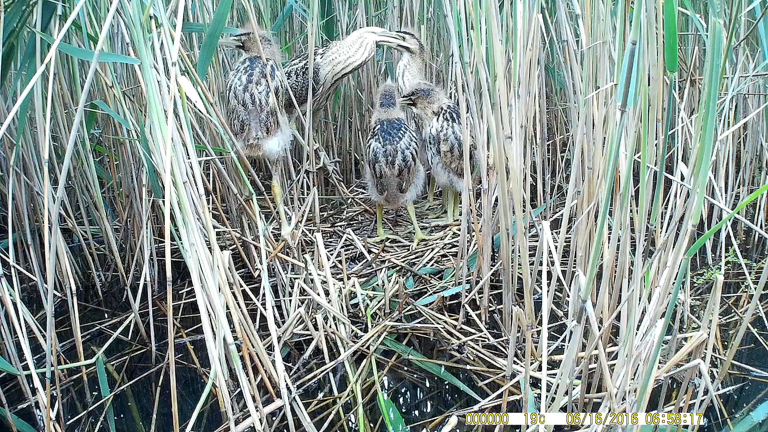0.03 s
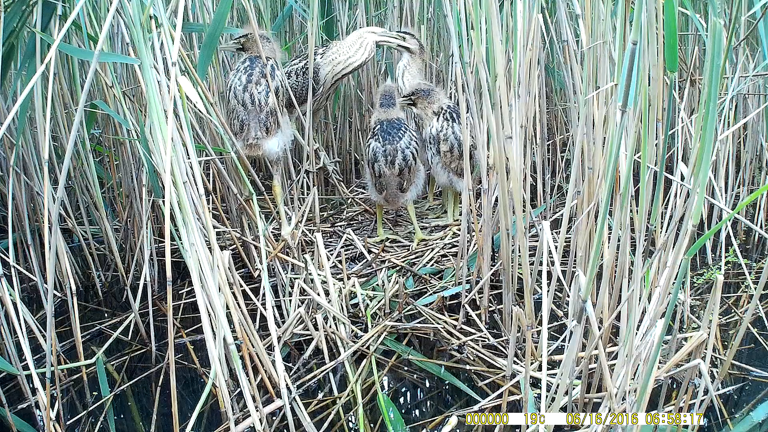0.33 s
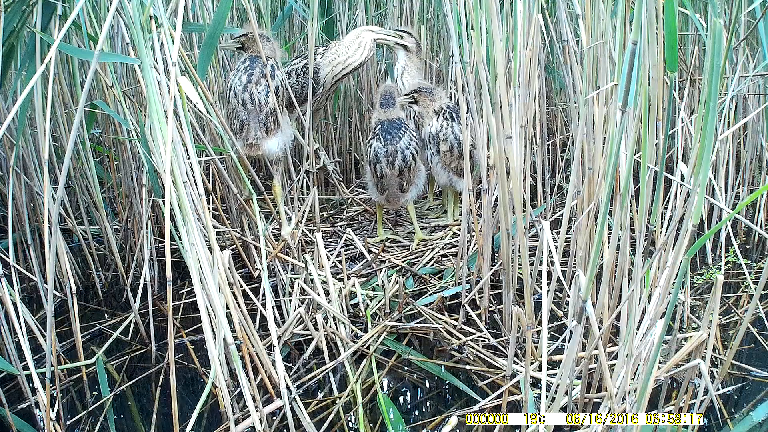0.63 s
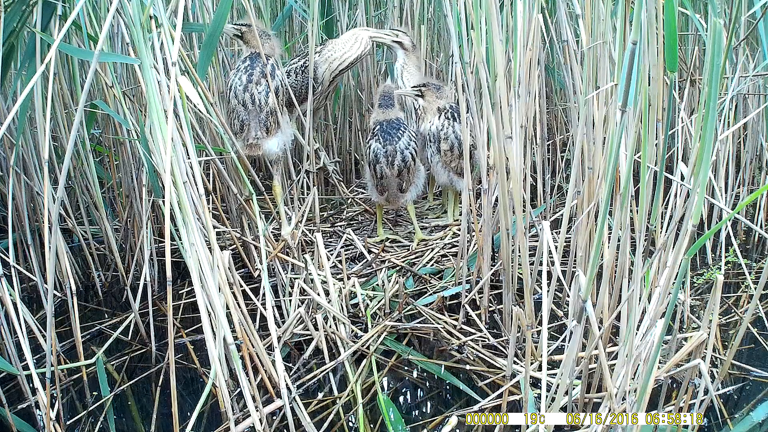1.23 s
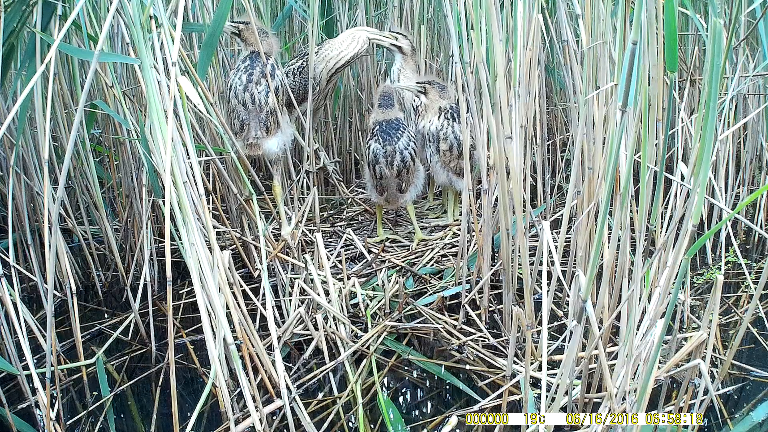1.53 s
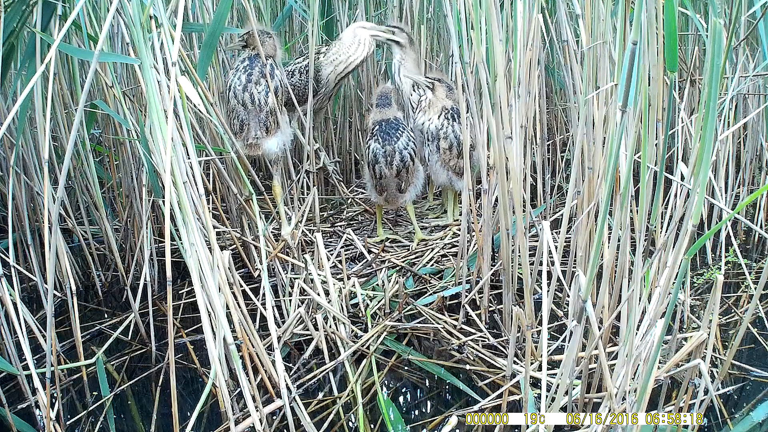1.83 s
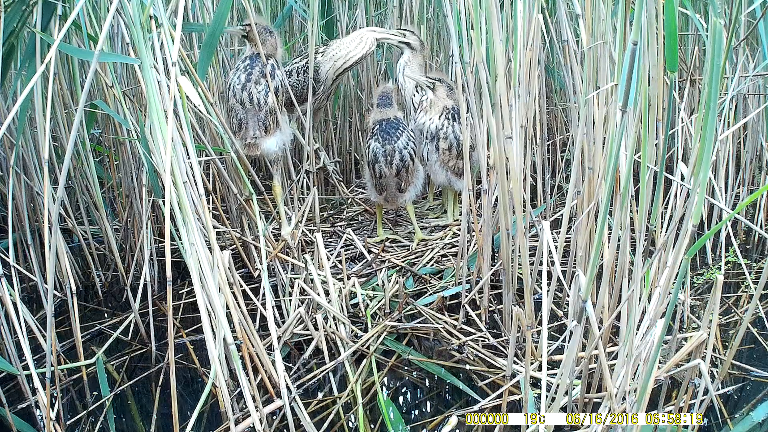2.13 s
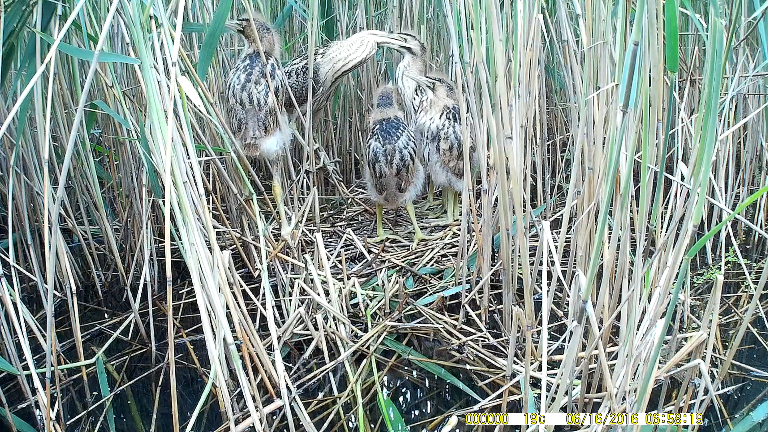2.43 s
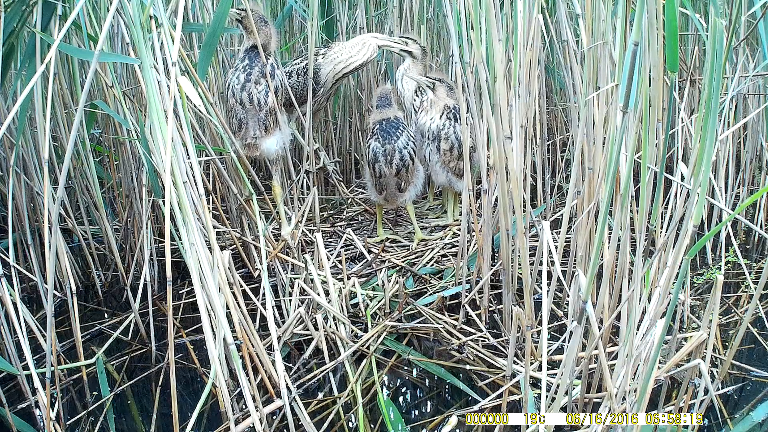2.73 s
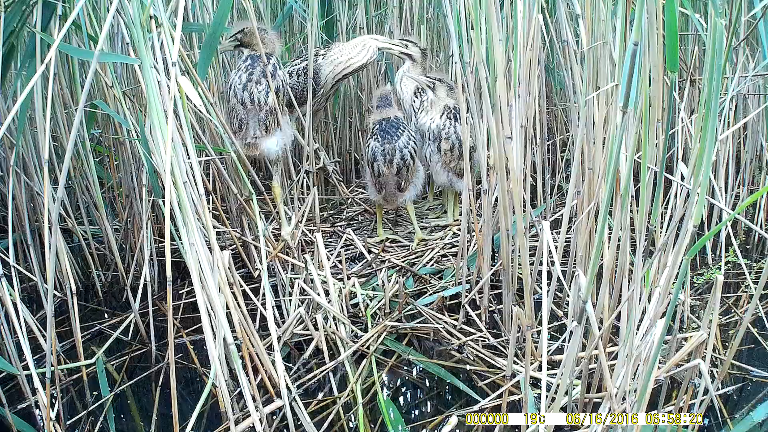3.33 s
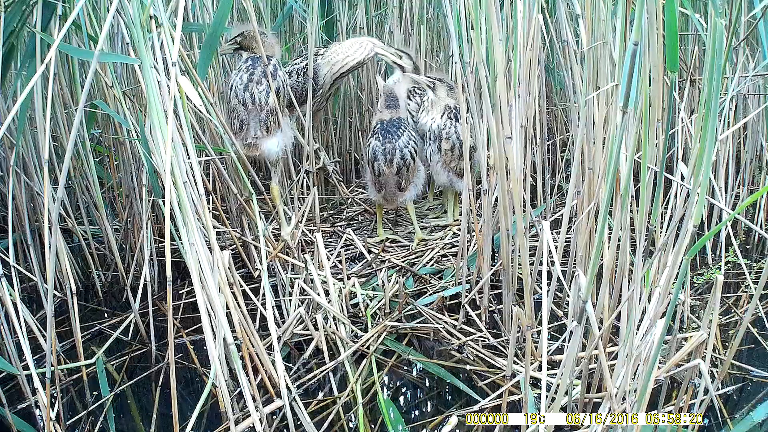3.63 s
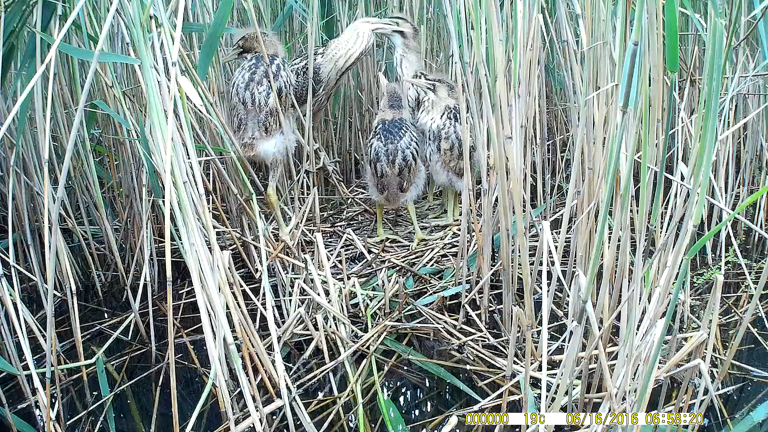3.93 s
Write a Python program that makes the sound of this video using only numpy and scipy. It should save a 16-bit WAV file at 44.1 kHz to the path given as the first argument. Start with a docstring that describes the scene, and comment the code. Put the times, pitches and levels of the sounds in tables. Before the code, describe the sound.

Young birds peep rapidly at a nest in the reeds, heard up close, while a more distant songbird whistles and ticks. The peeps grow hoarser, and four clucks lead into four harsh, squealing calls. A faint rumble lies underneath.

```python
"""A reed bed, one microphone close to a bittern nest. Chicks beg with rising peeps and soft mews; later
come four clucks and four harsh rattling calls, throat tones broken up by turbulence.
Farther off a songbird whistles, ticks, rasps and chirps. The reeds scatter every bird's voice.
Underneath lie a faint rumble, hiss and a thin electronic whine."""
import sys
import numpy as np
from scipy import signal
from scipy.fft import rfft, irfft
from scipy.io import wavfile
from scipy.ndimage import uniform_filter1d, map_coordinates

SR = 44100
rng = np.random.default_rng(int(sys.argv[2]) if len(sys.argv) > 2 else 0)


def materialize(psi):
    """Save the field psi as 16-bit PCM at rate SR to the path in sys.argv[1].

    A 1-D psi becomes a single channel; in a 2-D psi each row is a channel.
    """
    bounded = np.clip(np.atleast_2d(psi).T, -1, 1)
    quanta = np.round(bounded * 32767).astype(np.int16)
    wavfile.write(sys.argv[1], SR, quanta)


N = 176400
T = np.arange(N) / SR


def from_db(db):
    """Decibels to gain."""
    return 10 ** (np.asarray(db) / 20)


def rms_one(x):
    """Scale to unit power."""
    return x / np.sqrt(np.mean(np.abs(x) ** 2) + 1e-20)


def add(out, start_s, x):
    """Mix x into out from start_s."""
    i = int(max(start_s, 0) * SR)
    out[i:i + len(x)] += x[:max(N - i, 0)]


def colour(x, curve):
    """Filter by a curve of (freq_hz, gain_db) points."""
    hz, db = np.transpose(curve)
    bins_hz = np.linspace(1e-3, SR / 2, len(x) // 2 + 1)
    return irfft(rfft(x) * from_db(np.interp(np.log(bins_hz), np.log(hz), db)), len(x))


def drift(per_s, size):
    """A smooth random curve with a spread near 1, changing about per_s times a second."""
    steps = rng.standard_normal(8192)
    return map_coordinates(steps, [np.arange(size) * per_s / SR], order=2, mode="wrap")


def gate(t, length_s, edge_s):
    """Rounded attack, hold and release."""
    return np.sin(np.pi / 2 * np.clip(np.minimum(t, length_s - t) / edge_s + .5, 0, 1)) ** 2


def phase_of(hz):
    """Running phase of a changing pitch, in radians."""
    return 2 * np.pi * np.cumsum(hz) / SR


# The air over the reed bed: freq_hz, gain_db
AIR_SPECTRUM = [(18,-5),(50,-3.5),(105,-1),(160,-6.5),(300,-9),(500,-18.5),(800,-21.5),(4300,-24.5),(7000,-32),(11500,-41),(15500,-45.5)]
# Narrow bands of low hum: centre_hz, level_db, width_hz
HUM_BANDS = [(49.5,-56,6.6),(73.2,-46.5,3.376),(101.7,-52,8.8)]

def background(rumble_db=-46, hiss_db=-52, split_hz=600):
    """Low rumble with wavering hum, and smooth hiss."""
    air = colour(rng.standard_normal(N), AIR_SPECTRUM)
    rumble = signal.sosfiltfilt(signal.butter(2, split_hz, fs=SR, output="sos"), air)
    out = from_db(rumble_db) * rms_one(rumble) + from_db(hiss_db) * rms_one(air - rumble)
    for hz, db, width_hz in HUM_BANDS:
        waver = drift(2 * width_hz, N) + 1j * drift(2 * width_hz, N)
        out += from_db(db) * rms_one((waver * np.exp(2j * np.pi * hz * T)).real)
    return out


def whine(pitch_hz=9521, level_db=-60.5, slips_per_s=72.95, slip_s=.001):
    """A thin, even electronic tone that slips half a cycle at a fast steady beat."""
    beat = T * slips_per_s
    slips = np.floor(beat) + np.clip(beat % 1 / (slip_s * slips_per_s), 0, 1)
    return np.sqrt(2) * from_db(level_db) * np.sin(2 * np.pi * pitch_hz * T - np.pi * slips)


def reeds(x, echo_db, t60_s=.83, early_s=.02):
    """Nearby stems scatter sound densely back to the microphone; a faint tail dies away after."""
    t = T[:SR // 2]
    decay = from_db(-60 * t / t60_s) + 3.5 * np.exp(-t / early_s)
    echo = rng.standard_normal(len(t)) * decay * (t > .003)
    return x + from_db(echo_db) * signal.fftconvolve(x, echo / np.linalg.norm(echo))[:N]


# The songbird, deeper in the reeds: start_s, length_s, level_db, from_hz, to_hz, waver_share
SONG_NOTES = [(0.09,0.11,-39.5,3505,3575,0.008),(0.322,0.15,-38.5,3514,3435,0.009),(.715,.13,-41.5,2720,2980,0.05),(1.03,0.071,-44,3060,2900,0.05),
              (1.28,0.125,-40.5,2860,2940,0.035),(1.59,.11,-42,2830,2840,0.04),(2.956,0.057,-47.5,5800,5500,0.028),(3.06,.11,-43,5820,5400,0.03),
              (3.113,0.019,-36,2890,2880,0.012),(3.866,.022,-37,3200,3730,0.0084),(3.86,0.083,-47.5,4200,4330,.022)]

def songbird_notes(flutter=.34, wander=.005):
    """Gliding whistles that turn buzzy where the pitch wavers widely."""
    out = np.zeros(N)
    for start_s, length_s, db, from_hz, to_hz, waver in SONG_NOTES:
        t = T[:int(length_s * 1.4 * SR)] - length_s * .2
        glide_hz = from_hz + (to_hz - from_hz) * t / length_s
        hz = glide_hz * (1 + waver * drift(900, len(t)) + wander * drift(60, len(t)))
        level = from_db(db) * gate(t, length_s, .4 * length_s) * (1 + flutter * drift(100.2, len(t)))
        add(out, start_s + t[0], level * np.sin(phase_of(hz)))
    return out


# The songbird's rasps: start_s, length_s, level_db
SONG_RASPS = [(0.719,.185,-47),(0.98,0.215,-47),(1.27,0.21,-46.5),(1.56,0.205,-47)]
# The colour of a rasp, shared by ticks and hoarse peeps: freq_hz, gain_db
RASP_SPECTRUM = [(1500,-32),(2150,-15.5),(2500,-2),(2900,-5),(3350,-3.5),(3900,-9),(4500,-19.5),(7000,-48)]

def songbird_rasps(pulses_per_s=140, depth=.27):
    """Unevenly pulsing noise, accented about three quarters through each rasp."""
    level = np.zeros(N)
    for start_s, length_s, db in SONG_RASPS:
        progress = (T - start_s) / length_s
        accent = 1 + .8 * np.exp(-((progress - .76) / .085) ** 2)
        level += from_db(db) * gate(T - start_s, length_s, edge_s=.075) * accent
    pulses = 1 + depth * np.sin(phase_of(pulses_per_s * (1 + .278 * drift(80, N))))
    return level * pulses * rms_one(colour(rng.standard_normal(N), RASP_SPECTRUM))


# The songbird's ticks: start_s, level_db
SONG_TICKS = [(0.562,-38),(0.575,-37.5),(0.617,-33.5),(0.639,-36),(0.65,-31.5),(0.6985,-33.5),(0.73,-35.5)]

def songbird_ticks(decay_s=.006):
    """Dry snaps of noise that die at once."""
    level = np.zeros(N)
    for start_s, db in SONG_TICKS:
        add(level, start_s, from_db(db) * np.exp(-T[:SR // 10] / decay_s))
    noise = rng.standard_normal(N)
    return colour(level * noise, RASP_SPECTRUM) / np.std(colour(noise, RASP_SPECTRUM))


# Hoarse overtones of a chick's voice: harmonic, level_db
CHICK_OVERTONES = [(2,-1),(3,-14)]

def chick_voice(hz, hoarse, waver=.025):
    """A wavering tone with rough overtones."""
    phase = phase_of(hz * (1 + waver * drift(391, len(hz))))
    overtones = sum(from_db(db) * np.sin(round(harmonic) * phase) * (1 + drift(900, len(hz)))
                    for harmonic, db in CHICK_OVERTONES)
    return np.sqrt(2) * np.sin(phase) + hoarse * overtones


FLICK_KNEE_S, FLICK_RISE_S, FLICK_ATTACK_S = .0065, .0038, .0057

def peep(t, top_hz, hoarse, low_share=1055 / 1780, break_s=.004, rasp_db=-14):
    """A quick upward flick, loudest at t = 0; a hoarse one breaks into a rasp just after."""
    climb = 1 / (1 + np.exp((FLICK_KNEE_S - t) / FLICK_RISE_S))
    hz = top_hz * (low_share + (1 - low_share) * climb)
    level, breaking = (1 / (1 + ((t - lag) / FLICK_ATTACK_S) ** 2 / 2) ** 2 for lag in (0, break_s))
    rasp = from_db(rasp_db) * rms_one(colour(rng.standard_normal(len(t)), RASP_SPECTRUM))
    return level * chick_voice(hz, hoarse * breaking / level / 2) + hoarse * breaking * rasp


def mew(t, flick_db, top_hz=1460, hold_s=.0426, hold_db=-51.5):
    """A flick that levels off into a soft held arch."""
    rise = 1 - .33 / (1 + np.exp((t - FLICK_KNEE_S / 2) / FLICK_RISE_S))
    droop = 1 - .07 * (t / hold_s) ** 4
    flick = from_db(flick_db) * np.exp(-(t / FLICK_ATTACK_S) ** 2)
    hold = from_db(hold_db) * gate(t, hold_s, hold_s / 2) * (1 + drift(198, len(t)) / 2)
    return (flick + hold) * chick_voice(top_hz * rise * droop, hoarse=.21)


def whimper(length_s, pitch_hz=1560, fall=.14):
    """A thin uneven note that droops in pitch."""
    t = T[:int(length_s * SR)]
    hz = pitch_hz * (1 + .0228 * rng.standard_normal()) * (1 - fall * (t / length_s) ** 2)
    swell = np.sqrt(np.sin(np.pi * t / length_s))
    return chick_voice(hz, hoarse=.52) * swell * (1 + .23 * drift(200, len(t)))


# Begging peeps at the nest, close to the microphone: peak_s, level_db
NEST_PEEPS = [(.036,-36.5),(.160,-38),(.537,-43.5),(.954,-42),(1.092,-41.5),(1.233,-40),(1.365,-41.5),(1.503,-40.5),(1.633,-40.5),(1.768,-40.5),(1.902,-40),(2.044,-41),(2.179,-39.5),(2.315,-35.5),
              (2.442,-38),(2.571,-38.5),(2.583,-44),(2.697,-36.5),(2.716,-43.5),(2.847,-42),(2.952,-37.5),(3.078,-39),(3.204,-36.5),(3.329,-39),(3.461,-38.5),(3.592,-41)]
# A second chick's mews: flick_s, flick_db
NEST_MEWS = [(.688,-45.5),(.817,-49),(1.298,-41),(1.438,-45),(1.571,-49),(1.697,-51),(1.809,-41.5),(1.936,-40.5),(2.06,-41),(2.19,-39.5),(2.819,-44.5)]
# Lone whimpers: start_s, length_s, level_db
NEST_WHIMPERS = [(0.186,0.029,-49.5),(3.009,0.057,-48)]

def begging_chicks(hoarse_db_per_s=2.5, fully_hoarse_s=2.4):
    """Three chicks call over one another; the peeps grow hoarser as the begging builds."""
    out = np.zeros(N)
    t = T[:int(.08 * SR)] - .025
    chance = rng.standard_normal((len(NEST_PEEPS), 3))
    for (peak_s, db), (sharper, later, louder) in zip(NEST_PEEPS, chance):
        hoarse = from_db(hoarse_db_per_s * min(peak_s - fully_hoarse_s, 0))
        top_hz = 1780 * (1 + .0246 * sharper)
        add(out, peak_s + t[0], from_db(db) * peep(t, top_hz, hoarse))
        tail_s = peak_s + .026 * np.exp(.2 * later)   # a faint whimper follows each peep
        add(out, tail_s, from_db(-56 + 3 * louder) * whimper(length_s=.038))
    for flick_s, db in NEST_MEWS:
        add(out, flick_s + t[0], mew(t, db))
    for start_s, length_s, db in NEST_WHIMPERS:
        add(out, start_s, from_db(db) * whimper(length_s))
    for peak_s in .343 + .1455 * np.arange(9):   # a deeper, fainter chick keeps its own steady beat
        add(out, peak_s + t[0], from_db(-51) * peep(t, top_hz=1205, hoarse=0))
    return out


# The colour of turbulence in the throat: freq_hz, gain_db
THROAT_SPECTRUM = [(500,-61),(1100,-19),(1750,-27),(2100,-4.5),(2600,3.5),(3050,-7),(3650,-12),(4100,-23),(4600,-27),(5500,-37),(9000,-59),(15000,-77)]

def throat_burst(length_s, hz, rough, sag=.18, edge_s=.00095, ring_s=.0011):
    """A falling throat tone broken up by turbulence; it swells and rings briefly on."""
    t = T[:int(2 * (length_s + 2 * edge_s) * SR)] - edge_s
    rough = np.clip(rough, 0, 1)
    turbulence = signal.hilbert(colour(rng.standard_normal(2 ** 13), THROAT_SPECTRUM))[:len(t)]
    tone = np.exp(1j * phase_of(hz * (1 - sag * np.minimum(t / length_s - .5, .5))))
    voice = np.sqrt(1 - rough) * tone + np.sqrt(rough) * rms_one(turbulence)
    voice /= np.sqrt(uniform_filter1d(np.abs(voice) ** 2, size=110) + .14)   # evens out the level
    pole = np.exp(-1 / (ring_s * SR))
    level = signal.lfilter([1 - pole], [1, -pole], gate(t + edge_s / 2, length_s, edge_s))
    return rms_one(voice.real) * level


def wheeze(hz, sag, length_s=.11, width_hz=520):
    """The hoarse end of a call: a fading narrow band of turbulence, sinking by the share sag."""
    t = T[:int(length_s * SR)]
    phase = phase_of(hz * (1 - sag * (t / length_s - .5)))
    voice = drift(width_hz, len(t)) * np.sin(phase) + drift(width_hz, len(t)) * np.cos(phase)
    return voice * np.sqrt(1 - t / length_s)


# Clucks at the nest: start_s, length_s, level_db, pitch_hz, roughness
NEST_CLUCKS = [(2.487,0.009,-29,2620,0.85),(2.563,0.0092,-32,2660,1.03),(2.695,0.011,-28.5,2600,1.1),(2.778,0.0072,-27,2565,0.54)]

def clucks(ring_hz=2440, ring_s=.044, ring_db=-14):
    """Single throat bursts, each ringing on hoarsely."""
    out = np.zeros(N)
    for start_s, length_s, db, hz, rough in NEST_CLUCKS:
        add(out, start_s, from_db(db) * throat_burst(length_s, hz, rough))
        ring = wheeze(ring_hz, sag=0)
        add(out, start_s + length_s, from_db(db + ring_db) * ring * np.exp(-T[:len(ring)] / ring_s))
    return out


# The throat favours a squeal's second harmonic: harmonic, level_db
SQUEAL_HARMONICS = [(1,-19.5),(2,4.5),(3,-18.5)]

def squeal(length_s, hz, rough, sag_per_s=1.8, fade_db_per_s=129, edge_s=.0026, spray_db=-10.5):
    """The clear sagging note at the height of a call; a rough one shakes and sprays hiss."""
    t = T[:int((length_s + 2 * edge_s) * SR)] - edge_s / 2
    phase = phase_of(hz * (1 - sag_per_s * t + rough * .026 * drift(900, len(t))))
    tone = sum(from_db(db) * np.sin(round(harmonic) * phase) for harmonic, db in SQUEAL_HARMONICS)
    tone *= 1 + rough * drift(500, len(t))
    spray_band = signal.butter(2, [3000, 5600], "band", fs=SR, output="sos")
    spray = signal.sosfilt(spray_band, rng.standard_normal(len(t)))
    voice = rms_one(tone) + rough * from_db(spray_db) * rms_one(spray)
    return voice * gate(t, length_s, edge_s) * from_db(-fade_db_per_s * (t - length_s / 2))


# Harsh calls, close to the microphone: squeal_start_s, squeal_db, pitch_hz, roughness, stutter_db
NEST_CALLS = [(3.371,-22,1240,0.02,-19),(3.548,-28,1192,0.27,-19.5),(3.812,-21,1253,0.06,-19.5),(3.9935,-18.5,1293,0.17,-19.5)]
# The stutter around each squeal: offset_s, length_s, relative_db, pitch_hz, roughness
STUTTER_BURSTS = [(-.070,0.0045,-19,2660,0.1),(-.061,0.0076,-7,2556,0.62),(-.0455,0.0059,-8,2457,0.3),(-.035,0.01,-5,2660,0.52),
                  (-.0165,.005,-1,2720,.35),(-.0065,0.0065,-0.5,2844,0.49),(0.018,0.0152,-8.5,2300,0.77)]

def harsh_calls(squeal_s=.025, wheeze_db=-20.5):
    """Stuttering throat bursts swell into a squeal and trail off in a falling wheeze."""
    out = np.zeros(N)
    for start_s, squeal_db, pitch_hz, roughness, stutter_db in NEST_CALLS:
        for offset_s, length_s, db, hz, rough in STUTTER_BURSTS:
            add(out, start_s + offset_s, from_db(stutter_db + db) * throat_burst(length_s, hz, rough))
        add(out, start_s, from_db(squeal_db) * squeal(squeal_s, pitch_hz, roughness))
        add(out, start_s + squeal_s, from_db(stutter_db + wheeze_db) * wheeze(hz=2260, sag=.22))
    return out


def scene():
    """In mono: the nest close by, the songbird deeper in the reeds."""
    begging = reeds(begging_chicks(), echo_db=-12)
    calls = reeds(clucks() + harsh_calls(), echo_db=-9.5)
    songbird = reeds(songbird_notes() + songbird_rasps() + songbird_ticks(), echo_db=-8.5)
    return (background() + whine() + songbird + begging + calls)[None]


def record(dry):
    """The top is cut steeply above 15750 Hz."""
    return signal.sosfilt(signal.ellip(10, .1, 80, 15750, fs=SR, output="sos"), dry)


dry = scene()
out = record(dry)
materialize(out)
```